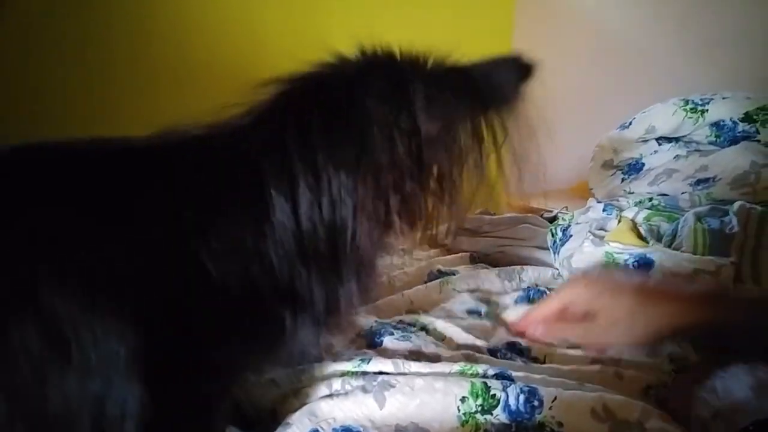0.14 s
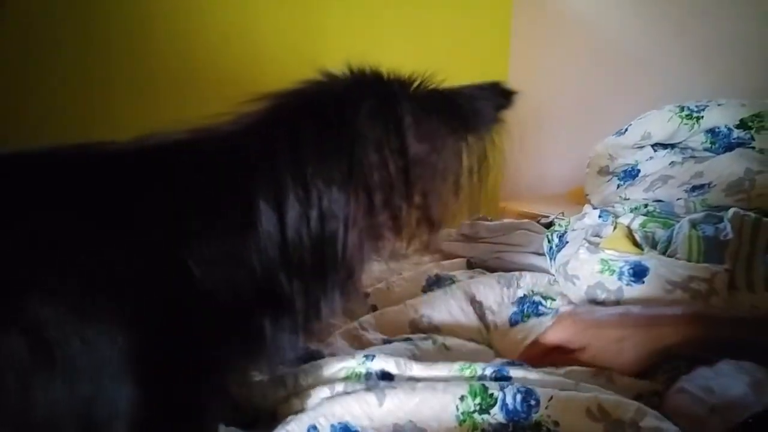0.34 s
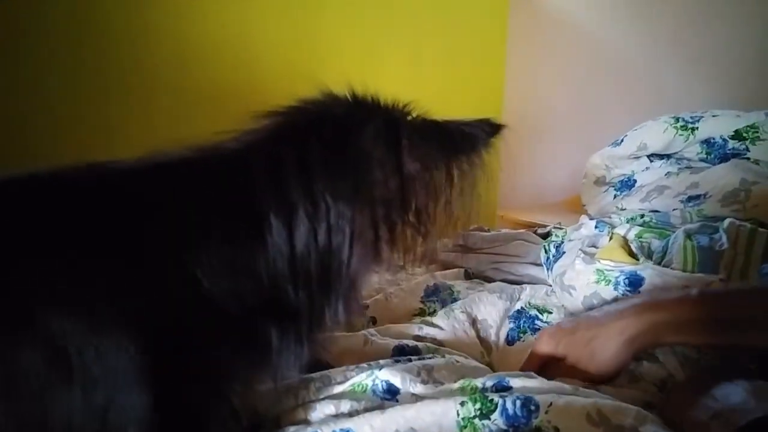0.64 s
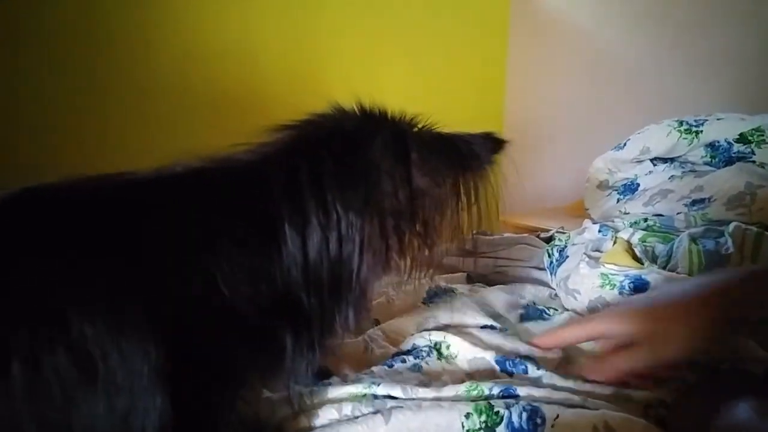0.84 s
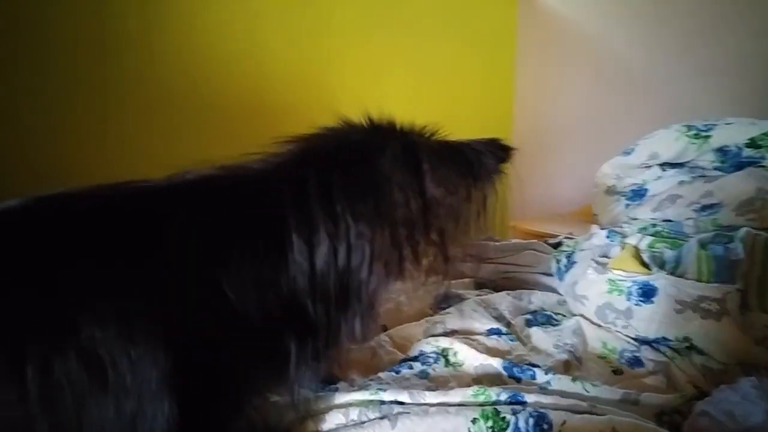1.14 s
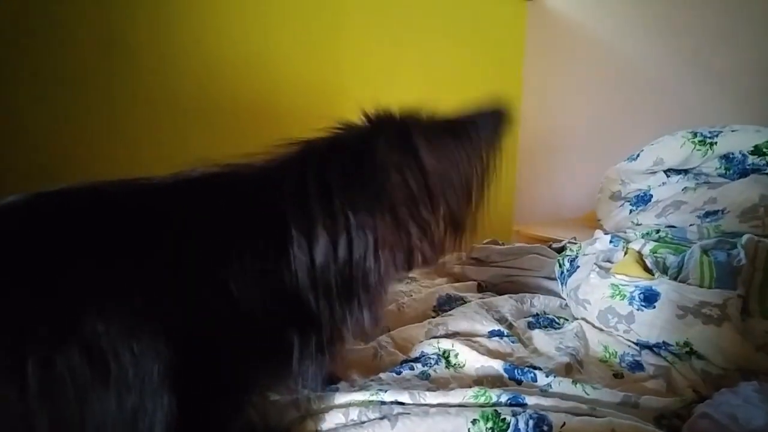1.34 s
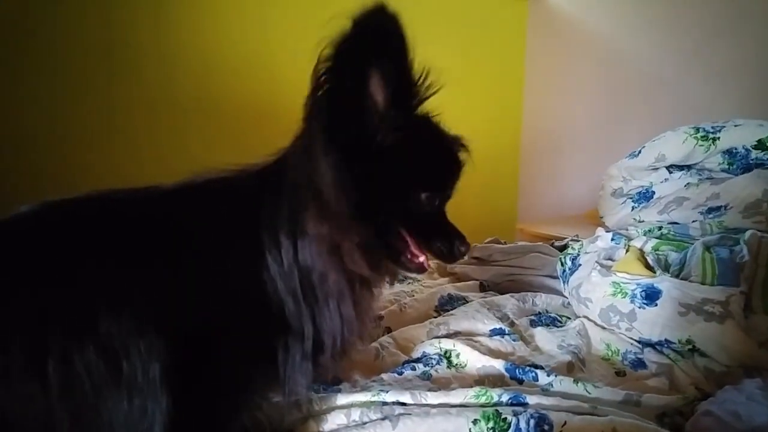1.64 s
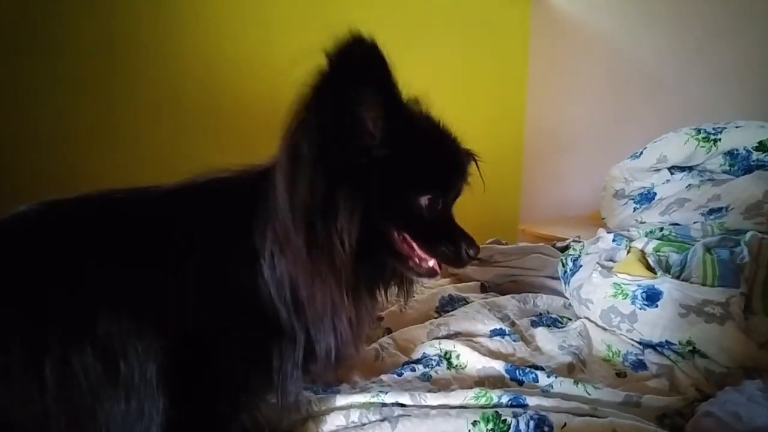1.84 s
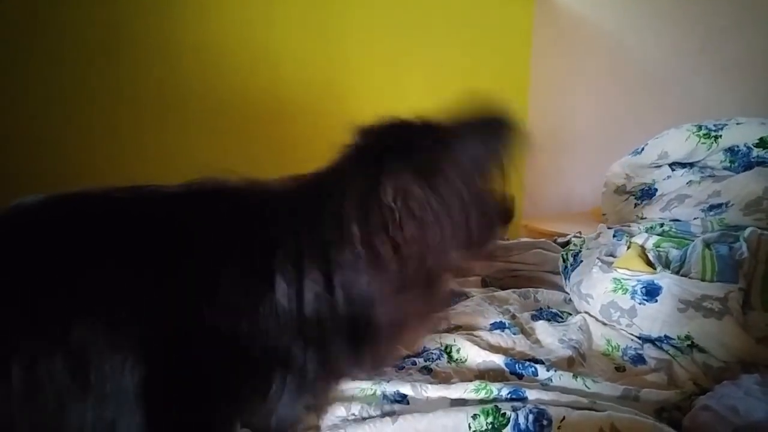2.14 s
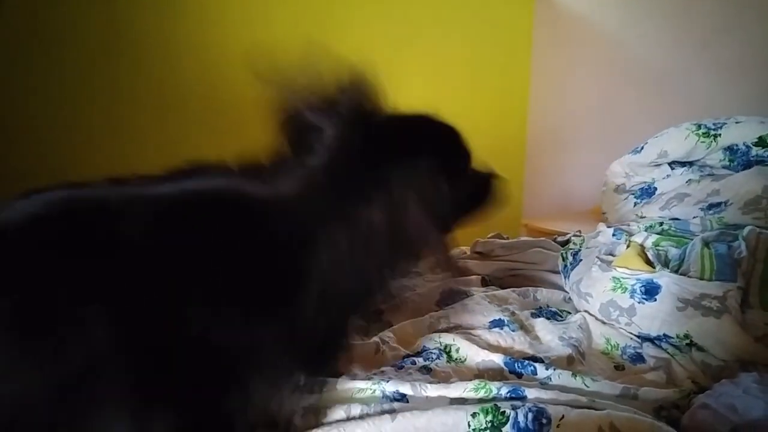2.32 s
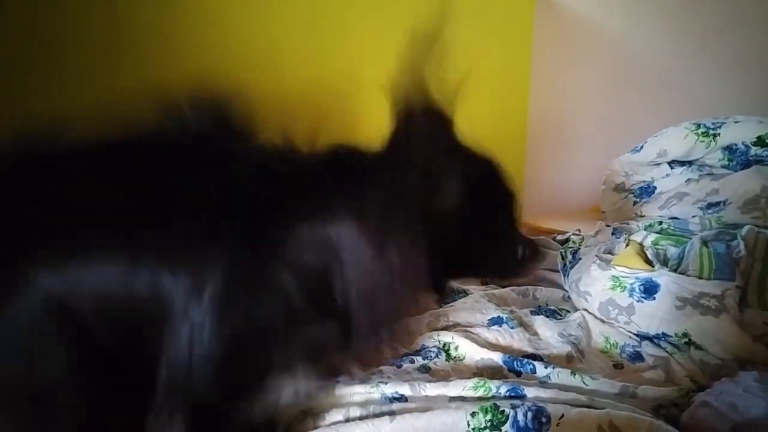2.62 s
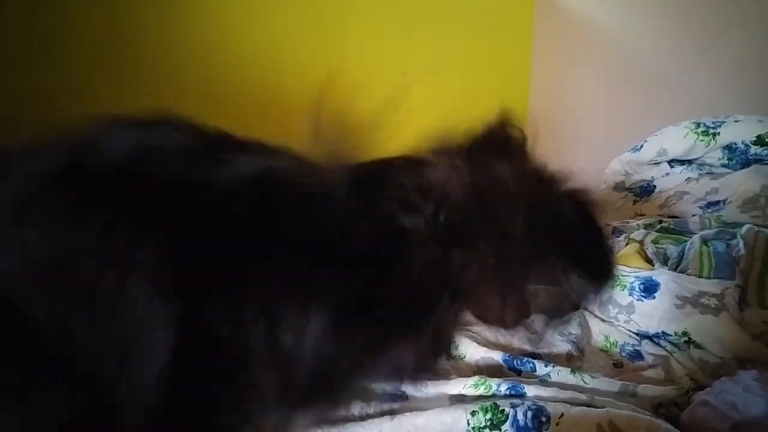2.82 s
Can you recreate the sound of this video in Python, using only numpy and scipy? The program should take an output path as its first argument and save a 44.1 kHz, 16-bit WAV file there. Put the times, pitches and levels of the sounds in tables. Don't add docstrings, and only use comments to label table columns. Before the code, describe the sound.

Close stereo phone pickup in a small quiet room: a piercing dog yelp jumps in pitch and breaks downward, followed by a thin sustained whine, with a late burst of soft paw thumps and rustling bedding.

```python
import sys
import numpy as np
from scipy import signal
from scipy.fft import rfft, irfft
from scipy.io import wavfile
from scipy.ndimage import uniform_filter1d, minimum_filter1d

SR = 44100
rng = np.random.default_rng(int(sys.argv[2]) if len(sys.argv) > 2 else 0)


def volts_from_db(level):
    exponent = np.asarray(level, float) / 20
    return 10 ** exponent


def log_audio(samples):
    frames = np.atleast_2d(samples).T
    limited = np.clip(frames, -1, 1)
    pcm = np.round(limited * 32767).astype(np.int16)
    wavfile.write(sys.argv[1], SR, pcm)


N = 132300

# freq_hz, level_db per Hz
ROOM_SPECTRUM = [(25, -30), (60, -5), (160, -21), (410, -9.5), (510, -20), (640, -11), (3000, -33.5),
                 (7500, -29)]
ROOM_DB = -64

# time_s, pitch_hz, level_db
YELP_REGISTERS = [
    [(.235, 1206, -18.5), (.263, 1375, -15.5), (.29, 1513, -14.5), (.32, 1795, -12), (.37, 1819, -12),
     (.4, 1916, -12.5), (.44, 2070, -11.5), (.456, 2154, -11)],
    [(.463, 2385, -11), (.49, 2483, -13.5), (.52, 2561, -13.5), (.562, 2577, -16), (.585, 2419, -14),
     (.606, 2173, -14.5), (.634, 1793, -18), (.703, 1774, -21.5)],
    [(.714, 1578, -24), (.752, 1361, -27.5), (.778, 957, -41.5), (.79, 889, -36)],
]
# time_s, pitch_hz, level_db
WHINE_STRETCHES = [
    [(.83, 1129, -33.5), (.9, 1323, -24), (.95, 1234, -25.5), (1.02, 1188, -27), (1.12, 1158, -24.5),
     (1.25, 1132, -28), (1.42, 1115, -27)],
    [(1.62, 1113, -26), (1.9, 1094, -30.5), (2.15, 1076, -30.5), (2.3, 1074, -30.5)],
    [(2.385, 1090, -31), (2.428, 1170, -24), (2.5, 1123, -28.5), (2.6, 1094, -30), (2.7, 1078, -31),
     (2.968, 1046, -39), (3.0, 1032, -37.5)],
]
# freq_hz, gain_db
YELP_MOUTH = [(1000, -6.5), (2200, -9.5), (3600, -8), (5000, 2.5), (6200, -6), (7500, -6.5), (10000, -20),
              (15000, -33)]
# freq_hz, gain_db
WHINE_MOUTH = [(1100, -5.5), (3300, -12), (4450, 1.5), (5600, -10.5), (7700, -35), (11000, -16.5),
               (12300, -27), (15500, -43)]
SCOOP, SCOOP_S, ATTACK_S = 0.19, 0.002886, 0.0024
JITTER, SHIMMER_DB, AIR_DB = 0.00026, -0.5, -71.5

WALLS_T60_S, WALLS_TREBLE_T60_S, WALLS_GAP_S = 0.18, 0.27, 0.0049
WALLS_DB, WALLS_LOW_DB = -2.5, -6

# start_s, peak_db, pitch_hz, brightness (0-1)
PAW_STEPS = [(1.47, -57, 50, 0.1), (1.92, -58.5, 58, 0.1), (2.424, -36.5, 305, 0), (2.466, -40.5, 90, .4),
             (2.528, -50, 131, 0.2), (2.587, -27, 327, 0.7), (2.63, -33.5, 70, .6), (2.646, -40.5, 260, .3),
             (2.708, -30.5, 800, .5), (2.74, -35, 302, 1), (2.764, -34.5, 90.5, 0.6), (2.79, -40, 700, .4),
             (2.845, -45, 65, 0.13), (2.968, -36.5, 810, .7)]
THUD_CYCLES, SNAP_T60_S, SNAP_DB = 9, 0.015, 10

# time_s, effort_db
WEIGHT_SHIFT = [
    (2.3, -29),
    (2.42, -5),
    (2.6, -6),
    (2.8, -3),
    (2.9, -16.5),
    (3.0, -9),
]
# freq_hz, level_db per Hz
BEDDING_SPECTRUM = [(25, -34), (62, -0.5), (130, -9.5), (320, -12), (520, -22.5), (720, -13), (1300, -23.5),
                    (4000, -70)]
BEDDING_DB, CLOTH_DB = -42.5, -81

# freq_hz, difference_db
PORT_TILT = [(300, 2), (1100, -8.5), (2200, -1.5), (4500, 7), (8000, 0)]
PORT_LAG_S, ALIKE_HZ = 0.00003, 897

# freq_hz, depth_db
MASK_NEAR = [(300, -59), (1500, -50.5), (2500, -39.5), (5500, -45), (7500, -44), (11000, -35), (15000, -26)]
# freq_hz, depth_db
MASK_LOUDEST = [(2000, -76.5), (9000, -59.5), (12000, -48.5), (16000, -42.5)]
GHOST_HZ, GHOST_DB = 48000 - SR, 7
TOP_HZ = 15900


def curve(rows, col):
    rows = np.array(rows)
    return np.interp(np.arange(N) / SR, rows[:, 0], rows[:, col])


def colour(table, hz):
    table = np.array(table)
    return np.interp(np.log(np.maximum(hz, 1)), np.log(table[:, 0]), table[:, 1])


def unit(x):
    return x / np.sqrt(np.mean(x ** 2))


def walk(rate_hz):
    hold = int(SR / rate_hz)
    steps = np.repeat(rng.standard_normal(N // hold + 1), hold)
    return 1.32 * uniform_filter1d(uniform_filter1d(steps, hold), hold)[:N]


def band(x, lo_hz, hi_hz):
    return signal.sosfilt(signal.butter(2, [lo_hz, hi_hz], "band", fs=SR, output="sos"), x)


def stereo_noise(table, flicker_db, rate_hz):
    hz = np.arange(N // 2 + 1) * SR / N
    out = 0
    for centre in 30 * 2. ** np.arange(10):
        octaves_off = np.abs(np.log2(np.maximum(hz, 1) / centre))
        share = np.clip(1 - octaves_off, 0, 1) ** 0.5
        spectrum = rfft(rng.standard_normal((2, N))) * share * volts_from_db(colour(table, hz))
        mid, side = irfft(spectrum, N)
        wide = np.clip(centre / ALIKE_HZ, 0.12, 1)
        ports = mid + wide * side * np.array([[1], [-1]])
        out = out + volts_from_db(flicker_db * walk(rate_hz)) * ports
    return out / np.sqrt(np.mean(out.mean(axis=0) ** 2))


def room_tone():
    return volts_from_db(ROOM_DB) * stereo_noise(ROOM_SPECTRUM, 1.3, 8.6)


def call(tables, throat, start_s, end_s, db, glide):
    t = np.arange(N) / SR
    rows = [row for table in tables for row in table]
    hz = uniform_filter1d(uniform_filter1d(curve(rows, 1), glide), glide)
    hz = hz * (1 + JITTER * walk(11))
    hz = hz * (1 - SCOOP * np.exp(-np.maximum(t - start_s, 0) / SCOOP_S))
    phase = 2 * np.pi * np.cumsum(hz) / SR
    stack = 0
    for k in range(1, 16):
        gain = volts_from_db(colour(throat, k * hz) + SHIMMER_DB * walk(9.38))
        gain = gain * (k * hz < 0.4 * SR)
        stack = stack + gain * np.sin(k * phase + k * k * 0.64)
    breath = unit(band(rng.standard_normal(N), 2100, 9000))
    air = volts_from_db(AIR_DB) * (1 + np.cos(phase)) * breath
    gate = np.clip((t - start_s) / ATTACK_S, 0, 1) * np.clip((end_s - t) / 0.02, 0, 1)
    level_db = uniform_filter1d(curve(rows, 2), size=400) + db
    return (stack + air) * gate * volts_from_db(level_db)


def yelp():
    return call(YELP_REGISTERS, YELP_MOUTH, start_s=0.231, end_s=0.8, db=-0.5, glide=260)


def walls(x):
    t = np.arange(SR // 2) / SR
    hiss = rng.standard_normal((2, len(t)))
    low = signal.sosfilt(signal.butter(2, 2800, fs=SR, output="sos"), hiss)
    low_tail = low * volts_from_db(WALLS_LOW_DB - 60 * t / WALLS_T60_S)
    treble_tail = (hiss - low) * volts_from_db(-60 * t / WALLS_TREBLE_T60_S)
    tail = (low_tail + treble_tail) * (1 - np.exp(-t / WALLS_GAP_S))
    tail = signal.sosfilt(signal.butter(2, 350, "high", fs=SR, output="sos"), tail)
    tail = tail / np.sqrt(np.sum(tail ** 2, axis=1, keepdims=True))
    return volts_from_db(WALLS_DB) * signal.fftconvolve(x[None], tail, axes=1)[:, :N]


def whine():
    return call(WHINE_STRETCHES, WHINE_MOUTH, start_s=0.827, end_s=4, db=4.5, glide=450)


def paws():
    out, t = np.zeros(N), np.arange(12000) / SR
    hisses = rng.standard_normal((len(PAW_STEPS), len(t)))
    for (start_s, db, hz, bright), hiss in zip(PAW_STEPS, hisses):
        bright = np.clip(bright, 0, 1)
        thud = np.sin(2 * np.pi * hz * t) * volts_from_db(-60 * t * hz / THUD_CYCLES)
        thud = thud * (1 - np.exp(-t * hz * 2))
        snap = volts_from_db(SNAP_DB) * band(hiss * volts_from_db(-60 * t / SNAP_T60_S), 270, 1560)
        hit = 3 * thud * (1 - bright) + bright * snap
        i = int(start_s * SR)
        out[i:i + len(t)] += volts_from_db(db) * hit[:N - i]
    return out


def bedding():
    crackle_db = 4 * rng.exponential(size=(2, N)) + 4 * walk(30)
    grains = rng.standard_normal((2, N)) * volts_from_db(crackle_db)
    cloth = volts_from_db(CLOTH_DB) * unit(band(grains, 900, 5000))
    rumble = volts_from_db(BEDDING_DB + 3.2 * walk(35.05)) * stereo_noise(BEDDING_SPECTRUM, 3, 25.28)
    return volts_from_db(curve(WEIGHT_SHIFT, 1)) * (rumble + cloth)


def microphone_ports(near):
    hz = np.arange(N // 2 + 1) * SR / N
    tilt = volts_from_db(colour(PORT_TILT, hz) / 2)
    left = tilt * np.exp(-2j * np.pi * hz * PORT_LAG_S)
    return irfft(rfft(near) * np.array([left, 1 / tilt]), N)


def scene():
    voice = yelp() + whine()
    steps = paws()
    direct = microphone_ports(voice + steps)
    return direct + walls(voice + 0.3 * steps) + bedding() + room_tone()


def ghost_lines(x):
    place = (np.arange(N) * GHOST_HZ / SR) % 1
    bend = np.roll(x, 1, axis=1) - 2 * x + np.roll(x, -1, axis=1)
    return x + volts_from_db(GHOST_DB) * (place * (1 - place) - 1 / 6) / 2 * bend


def masked(x):
    hz, _, z = signal.stft(x, SR, nperseg=1536)
    size = np.abs(z)
    nearest = -minimum_filter1d(-size, size=45, axis=1)
    loudest = size.max(axis=1, keepdims=True)
    near_edge = nearest * volts_from_db(colour(MASK_NEAR, hz))[:, None]
    loud_edge = loudest * volts_from_db(colour(MASK_LOUDEST, hz))[:, None]
    heard = uniform_filter1d(size, size=5, axis=1) > np.maximum(near_edge, loud_edge)
    return signal.istft(z * heard, SR, nperseg=1536)[1][:, :N]


def band_limit(x):
    return signal.sosfilt(signal.butter(12, 16430, fs=SR, output="sos"), x)


def record(dry):
    low_pass = signal.ellip(8, 0.2, 60, TOP_HZ, fs=SR, output="sos")
    cut = signal.sosfilt(low_pass, ghost_lines(dry))
    return band_limit(masked(cut))


dry = scene()
out = record(dry)
log_audio(out)
```